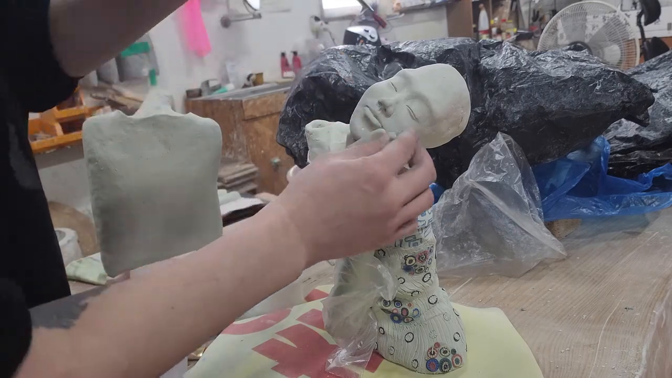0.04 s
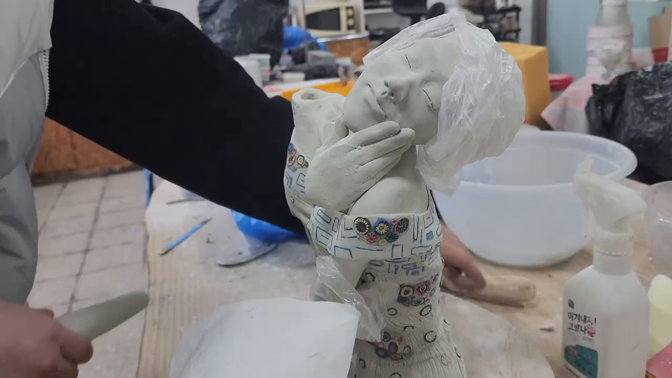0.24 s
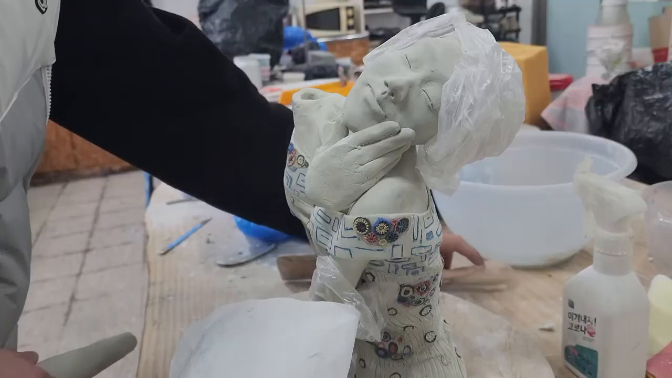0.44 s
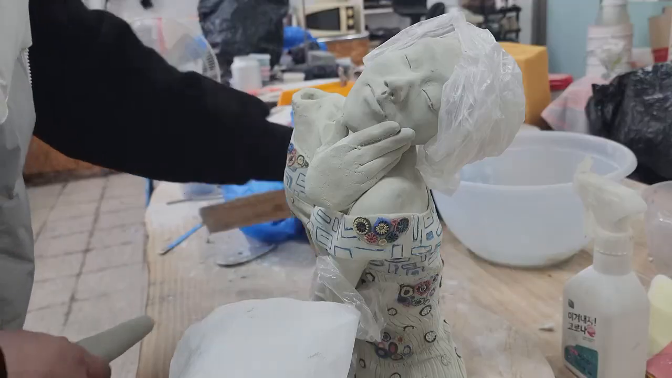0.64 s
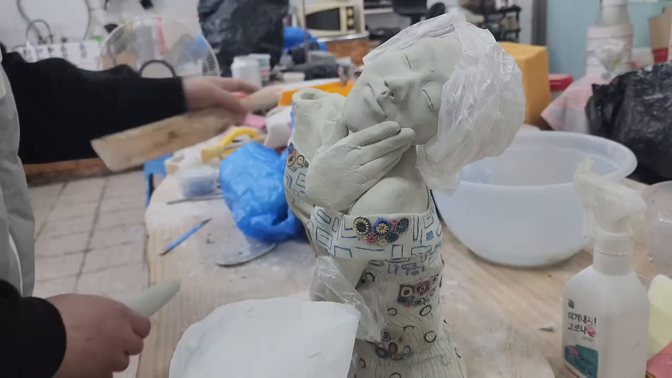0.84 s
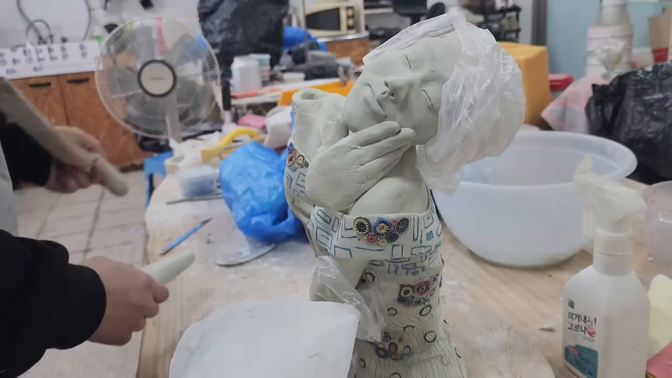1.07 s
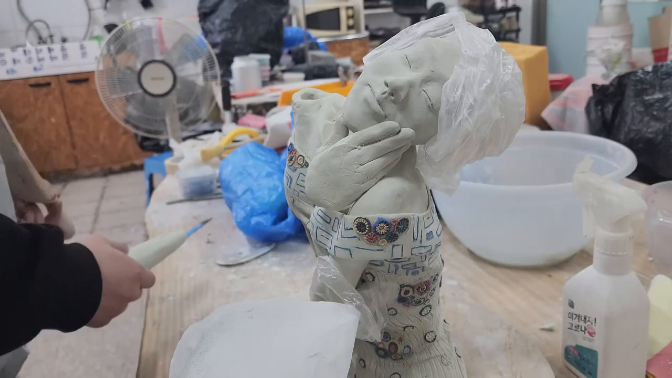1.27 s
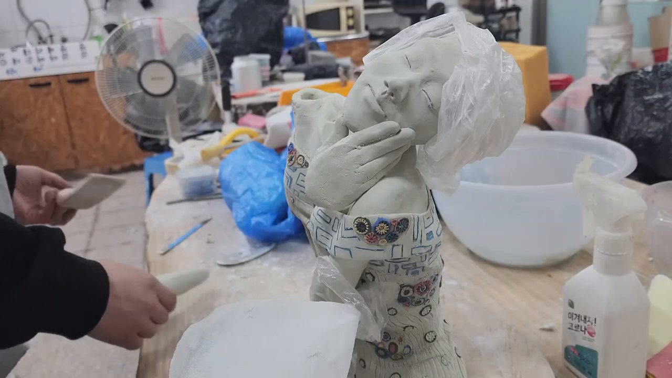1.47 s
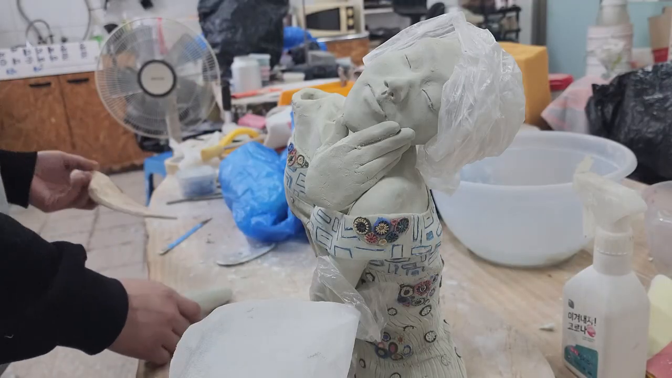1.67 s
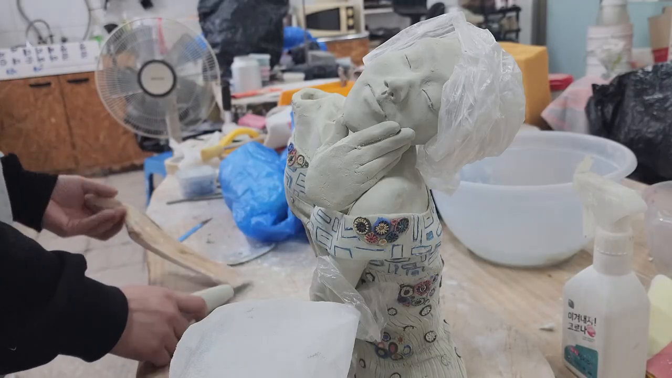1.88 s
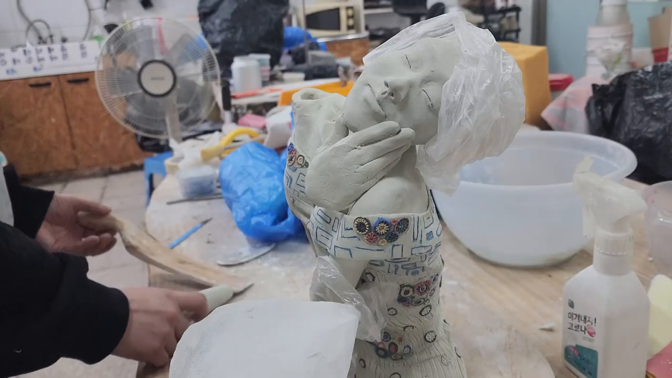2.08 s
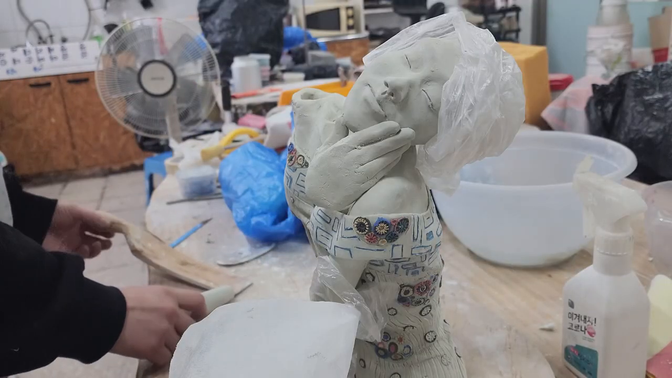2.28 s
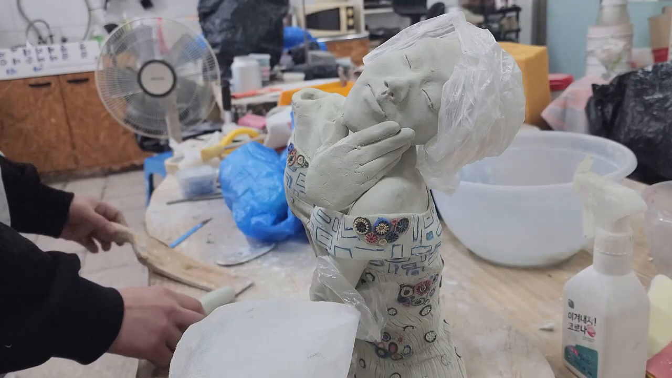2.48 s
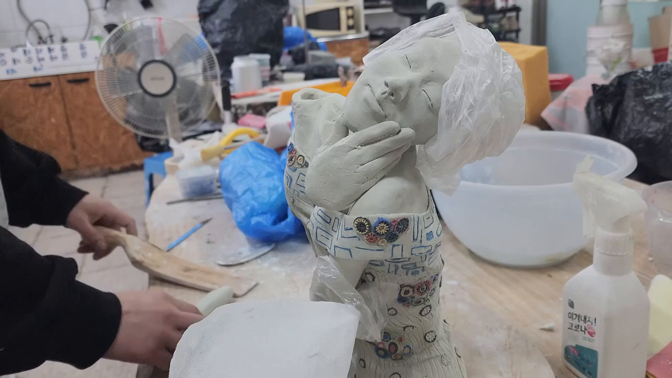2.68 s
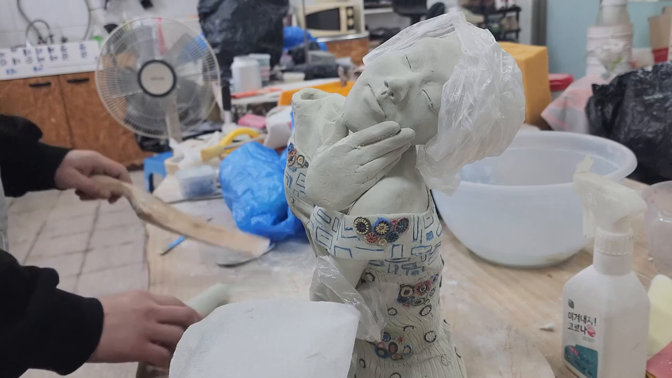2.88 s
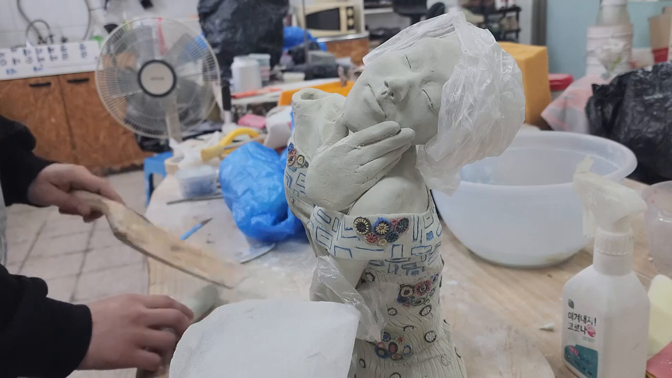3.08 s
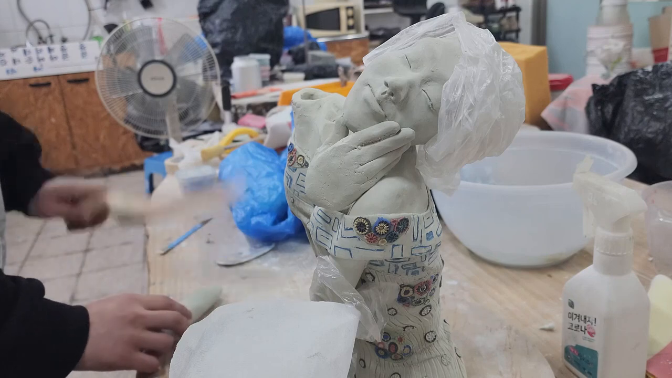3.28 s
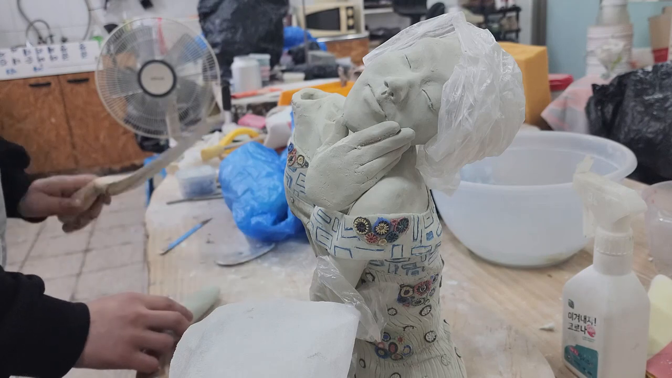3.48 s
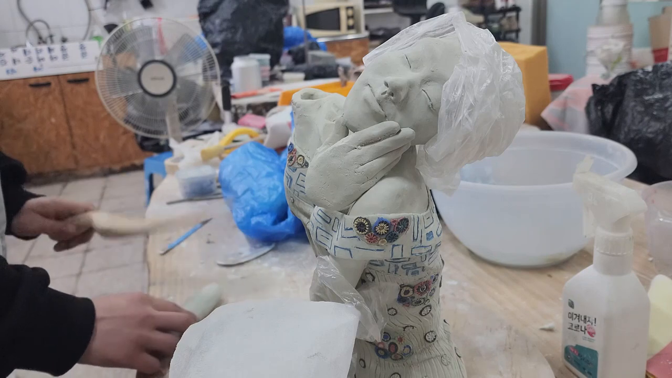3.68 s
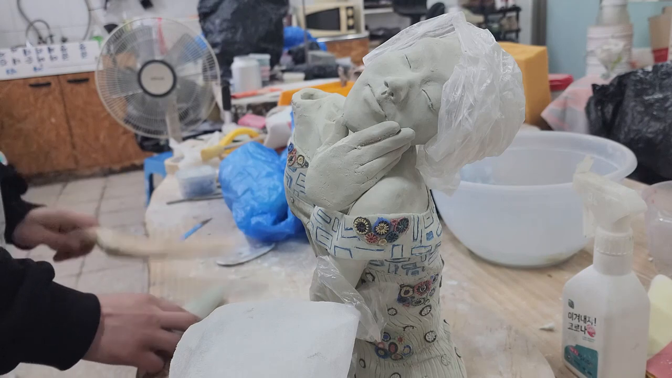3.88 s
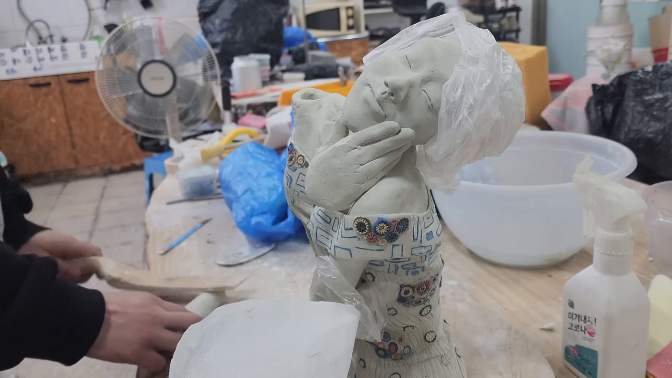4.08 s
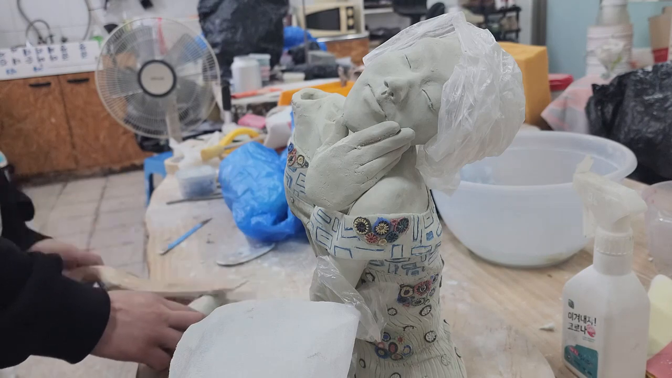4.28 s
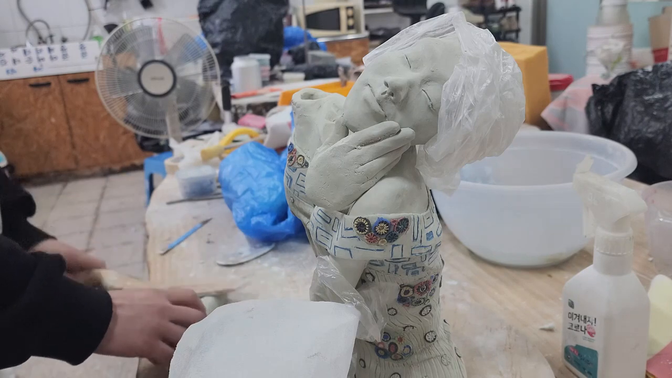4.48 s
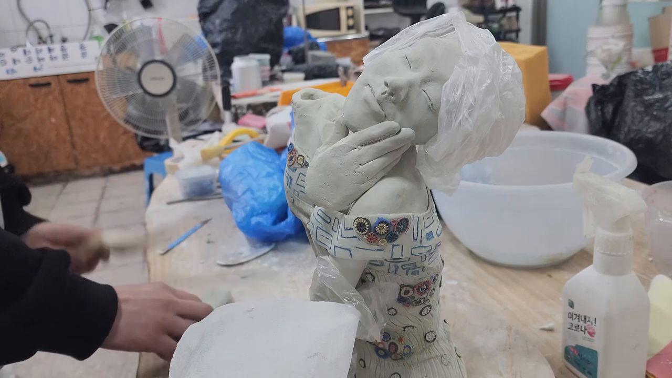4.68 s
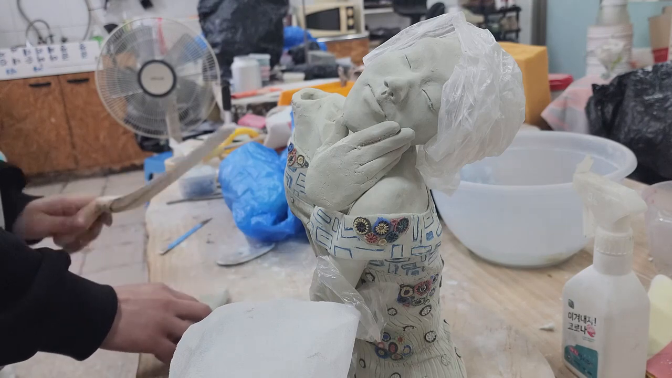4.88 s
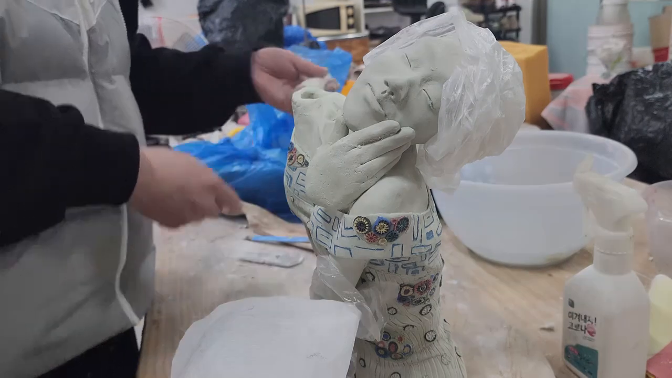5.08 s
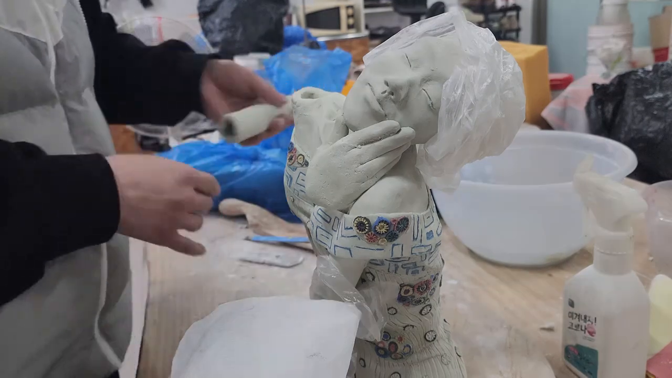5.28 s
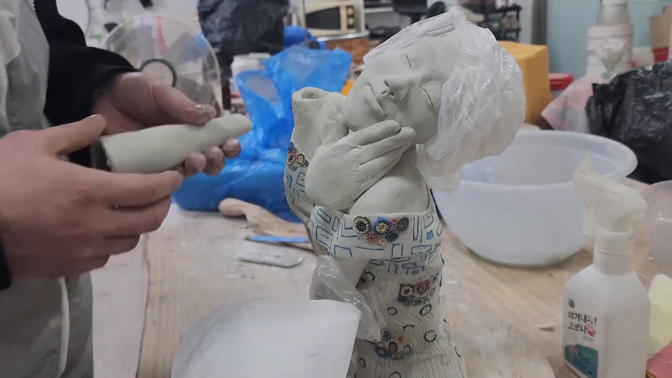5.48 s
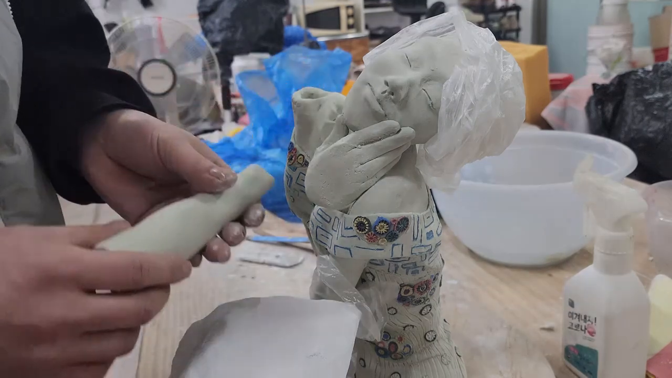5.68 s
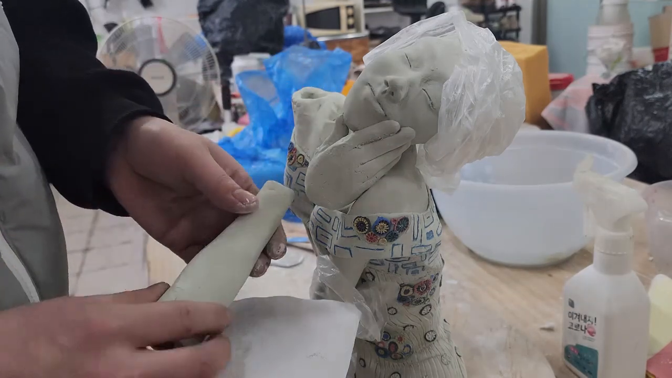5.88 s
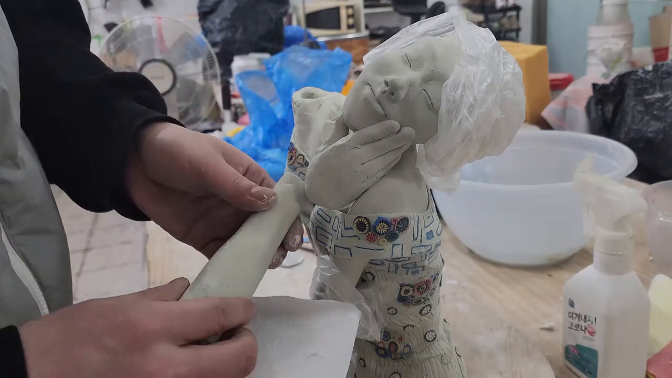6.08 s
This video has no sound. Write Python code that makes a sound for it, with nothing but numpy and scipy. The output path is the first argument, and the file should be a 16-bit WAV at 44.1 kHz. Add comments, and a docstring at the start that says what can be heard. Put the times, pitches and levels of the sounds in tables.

```python
"""A wooden paddle beats a roll of soft clay eight times in a pottery studio.
Each impact excites a wet slap, a hollow tock of paddle modes damped by the clay and a thump of the
bench; a small hard room reflects the slap and tock. Beforehand the paddle is picked up, clacking and
scraping on the bench, while sleeves swish. The last blow stops abruptly; then hands slide over the
clay with a faint hiss of friction. A low rumble and a machine hum lie underneath."""
import sys
import numpy as np
from scipy import signal
from scipy.fft import rfft, irfft, next_fast_len
from scipy.io import wavfile
from scipy.ndimage import map_coordinates

SR = 44100
rng = np.random.default_rng(int(sys.argv[2]) if len(sys.argv) > 2 else 0)


def int16_out(signal):
    """Quantize to a 16-bit WAV file."""
    q = np.round(np.clip(np.atleast_2d(signal).T, -1, 1) * 32767)
    wavfile.write(sys.argv[1], SR, q.astype(np.int16))


N = 271028
CUTOFF_S = 5.092  # the last blow falls silent here


def amp(db):
    """Amplitude ratio of a level; the tables' levels are relative, before each source's gain."""
    return 10 ** (np.asarray(db) / 20)


def unit(x):
    """Normalisation to rms 1."""
    return x / np.sqrt(np.mean(x ** 2) + 1e-20)


def along(points, hz):
    """Interpolation of (f/Hz, value) points on a logarithmic frequency axis."""
    f, v = np.transpose(points)
    return np.interp(np.log(hz + 1), np.log(f + 1), v)


def curve(rows):
    """Linear interpolation of (t/s, value) rows at every sample."""
    return np.interp(np.arange(N) / SR, *np.transpose(rows))


def wobble(rate):
    """Random modulation: a spline through rate knots a second."""
    return map_coordinates(rng.standard_normal(int(N * rate / SR) + 4), [np.arange(N) * rate / SR])


def filtered(x, response):
    """Linear filtering: the spectrum is multiplied by a complex frequency response."""
    n = x.shape[-1]
    m = next_fast_len(n + SR // 4, True)
    return irfft(rfft(x, m) * response(np.fft.rfftfreq(m, 1 / SR)), m)[..., :n]


def coloured(x, points, size=1024):
    """Minimum-phase filtering by (f/Hz, level/dB) points; folding the cepstrum makes it causal."""
    cepstrum = irfft(np.log(amp(along(points, np.fft.rfftfreq(size, 1 / SR)))))
    cepstrum[1:size // 2] *= 2
    cepstrum[size // 2 + 1:] = 0
    return signal.fftconvolve(x, irfft(np.exp(rfft(cepstrum))))[:len(x)]


def stereo(pair, spectrum, coherence):
    """Partial coherence: two independent noises mix as mid and side into left and right."""
    def response(hz):
        angle = np.arccos(np.clip(along(coherence, hz), -1, 1)) / 2
        return amp(along(spectrum, hz)) * np.array([np.cos(angle), np.sin(angle)])
    mid, side = filtered(pair, response)
    return np.array([mid + side, mid - side])


def noise(spectrum, coherence):
    """Stationary stereo noise of rms 1."""
    return unit(stereo(rng.standard_normal((2, N)), spectrum, coherence))


def fade(t60):
    """One second of exponential decay, 60 dB in t60 seconds."""
    return np.exp(-np.log(1000) * np.arange(SR) / SR / t60)


def mode(hz, t60, rise):
    """A damped oscillator that builds up over rise seconds."""
    t = np.arange(SR) / SR
    return np.sin(2 * np.pi * hz * t) * fade(t60) * (1 - np.exp(-(t / rise) ** 2))


def ring(modes, rise, scatter_db, detune):
    """Modal superposition with alternating signs; strength and pitch vary with each contact."""
    return sum((-1) ** k * amp(db + scatter_db * rng.normal())
               * mode(hz * (1 + detune * rng.normal()), t60, rise)
               for k, (hz, db, t60) in enumerate(modes))


def burst(colour, t60, rise):
    """A broadband transient: decaying noise of unit energy, then coloured."""
    crack = rng.standard_normal(SR) * fade(t60) * (1 - np.exp(-np.arange(SR) / SR / rise))
    return coloured(crack / np.linalg.norm(crack), colour)


def add(track, s, sound):
    """Superposition at time s; a sound begun before CUTOFF_S ends there at the latest."""
    start = round(s * SR)
    end = round(CUTOFF_S * SR) if s < CUTOFF_S else N
    part = sound[:, :end - start]
    track[:, start:start + part.shape[1]] += part


# ambient noise spectrum before its tilt: f/Hz, level/dB
AMBIENT_SPECTRUM = [(12, -27.5), (20, -2), (43, -3), (101, -5), (127, -5.5), (241, -17.5), (319, -17.5),
                    (434, -24), (499, -24), (759, -26), (2530, -33.5), (3630, -29.5), (5680, -29.5),
                    (14700, -44), (16000, -41.5)]
# likeness of the ambient noise left and right: f/Hz, coherence
AMBIENT_COHERENCE = [(60, 0.94), (180, 1), (550, 0.45), (1650, 0.06), (4970, 0.075), (15000, 0.25)]
# ambient noise envelope, in three spans: t/s, level/dB
AMBIENT_ENVELOPE = [
    [(0.0, -70), (0.104, -73.5), (0.3, -69)],
    [(0.75, -68.5), (0.95, -66.5), (3.35, -70.5)],
    [(5.15, -64), (5.628, -65), (6.12, -70)],
]
def room_rumble():
    """Ambient noise, most coherent between left and right at long wavelengths."""
    tilt = [(22, -19.0), (31, 0.0), (2000, 7), (5000, -12.5), (12000, -13.5)]  # f/Hz, level/dB
    air = filtered(noise(AMBIENT_SPECTRUM, AMBIENT_COHERENCE), lambda hz: amp(along(tilt, hz)))
    return amp(curve(np.vstack(AMBIENT_ENVELOPE)) + 12) * air


# tone of a machine in the building: f/Hz, level/dB
MACHINE_TONE = [(37.7, -54)]
def machine_hum():
    """A low tone under slow random amplitude and phase modulation."""
    waver_db, drift = 2.5 * wobble(3), 1.2 * wobble(2.5)
    t = np.arange(N) / SR
    return sum(amp(db + waver_db) * np.sin(2 * np.pi * hz * t + drift) for hz, db in MACHINE_TONE)


# reverberation time: f/Hz, T60/s
TAIL_DECAY = [(100, 0.67), (300, 0.35), (800, 0.34), (2200, 0.37), (5000, 0.32), (8000, 0.3), (14000, 0.2)]
# spectrum of the reverberant field: f/Hz, level/dB
TAIL_SPECTRUM = [(100, 16.5), (350, 8), (550, -4), (800, -11.5), (1300, -1.5), (2300, 3), (4200, 5.5),
                 (7000, 1.5), (15000, 6)]
# likeness of the room's field left and right: f/Hz, coherence
ROOM_COHERENCE = [(100, 1), (400, 0.75), (900, 0.82), (1800, 0.13), (4000, .05)]
def room_tail():
    """Impulse response of a diffuse field: noise in which each frequency decays at its own rate."""
    hz, t, bands = signal.stft(rng.standard_normal((2, SR // 2)), SR, nperseg=256)
    decay = np.exp(-np.log(1000) * t / along(TAIL_DECAY, hz)[:, None])
    tail = signal.istft(bands * decay, SR, nperseg=256)[1]
    tail = stereo(tail / np.linalg.norm(tail[0]), TAIL_SPECTRUM, ROOM_COHERENCE)
    tail *= 1 - np.exp(-(np.arange(tail.shape[1]) / SR / 0.0048) ** 2)  # echo density builds up
    return np.pad(tail, ((0, 0), (0, SR - tail.shape[1])))


def reverb(source, colour, source_db, wash_db):
    """Reverberation by convolution, plus a wash of the crack radiated in all other directions."""
    echo = signal.fftconvolve(source[None], room_tail(), axes=1)[:, :SR]
    wash = np.array([coloured(side, colour) for side in room_tail()])
    return amp(source_db) * echo + amp(wash_db) * wash


# echoes from the nearest walls: delay t/s, level/dB
REFLECTIONS = [(.0082, -3.5), (.0098, -18), (0.0152, -23), (.0212, -27), (.028, -11.5)]
# response of those walls: f/Hz, level/dB
WALL_RESPONSE = [(100, -7.5), (800, -25.5), (1400, 1.5), (2300, -0.5), (5000, -13.5), (15000, -11)]
def near_paths(x, lead_s):
    """Path differences: the direct sound arrives first on the left, and early reflections follow."""
    delay = lambda hz, s: np.exp(-2j * np.pi * hz * s)
    direct = filtered(x, lambda hz: delay(hz, lead_s / 2 * np.array([[-1], [1]])))
    walls = lambda hz: sum(amp(db) * delay(hz, s + rng.normal(0, 6e-5, (2, 1))) for s, db in REFLECTIONS)
    return direct + filtered(coloured(x, WALL_RESPONSE), walls)


def strokes(rows, attack_s=0.017, release_s=0.045):
    """Envelope of sliding friction: each rub gathers speed, holds and decays exponentially."""
    t = np.arange(N) / SR
    return sum(amp(db) * np.clip((t - s) / attack_s, 0, 1)
               * np.exp(-np.maximum(t - s - length, 0) / release_s) for s, length, db in rows)


# spectrum of rubbing fabric: f/Hz, level/dB
SLEEVE_SPECTRUM = [(200, -27), (1200, 2), (3000, -1), (7500, 0), (10000, -6.5), (15000, -10.5)]
# moves of the arm: t/s, duration/s, level/dB
ARM_MOVES = [(.28, 0.21, -64.5), (.55, 0.23, -72), (.8, 0.34, -69.5), (1.1, 0.094, -63.5),
             (1.22, 0.07, -66.5), (1.34, .33, -66), (1.84, 0.054, -66.5), (2.11, 0.069, -64.5),
             (2.3, 0.13, -72), (2.65, 0.07, -70), (2.94, .16, -76.5), (3.15, 0.03, -73),
             (3.27, 0.17, -71.5)]
def sleeve():
    """Friction noise of fabric, rising with each move of the arm and while it swings the paddle."""
    t = np.arange(N) / SR
    rest_db, swing_db = -85.5, -72
    swinging = (t > PADDLE_BLOWS[0][0]) & (t < CUTOFF_S)
    motion = amp(rest_db) + amp(swing_db) * swinging + strokes(ARM_MOVES)
    return motion * amp(1.0) * noise(SLEEVE_SPECTRUM, coherence=[(1000, 0.47), (6000, 0.3)])


# spectrum of palms on clay: f/Hz, level/dB
PALM_SPECTRUM = [(710, -39), (1200, -9), (1540, -5), (2680, -3), (4750, -4.5), (7410, -6), (9720, -14),
                 (14800, -18), (16000, -19)]
# fingers taking hold: t/s, duration/s, level/dB
FINGER_GRIPS = [(5.095, 0.097, -68), (5.275, 0.03, -63)]
# one long stroke along the clay: t/s, level/dB
PALM_STROKE = [(5.38, -80), (5.508, -58), (5.59, -60.5), (5.744, -55), (5.858, -59), (6.012, -76),
               (6.13, -71)]
def palms():
    """Friction noise of skin on clay: two short grips, then a smoothing stroke."""
    sliding = np.arange(N) / SR > PALM_STROKE[0][0]
    motion = strokes(FINGER_GRIPS) + amp(curve(PALM_STROKE) - 3) * sliding
    return motion * amp(6.5) * noise(PALM_SPECTRUM, coherence=[(1000, 0.21), (6000, 0.19)])


# brief drags of the paddle: t/s, level/dB, squeak f/Hz
SCRAPES = [(0.959, -53, 5170), (1.351, -46, 3550), (1.457, -54, 4250), (2.6206, -47.5, 3570),
           (2.872, -54.5, 5370), (2.8962, -46, 5430), (3.2708, -57, 6140)]
# spectrum of wood on grit: f/Hz, level/dB
SCRAPE_SPECTRUM = [(300, -25), (2400, -10), (3400, -3.5), (8000, -8), (11000, -19), (16000, -15)]
def paddle_scrapes():
    """Friction on grit: tiny impulsive catches hiss and excite a faint resonant squeak."""
    out = np.zeros((2, N))
    t = np.arange(SR // 4) / SR
    stroke = (t / 0.028) * np.exp(1 - t / 0.026)
    for s, db, squeak_hz in SCRAPES:
        catches = rng.standard_normal((2, len(t))) ** 3  # cubing makes the noise spiky
        grit = filtered(catches, lambda hz: 0.37 + 1 / (1 + 1j * (hz - squeak_hz) / 130))
        add(out, s - .02, amp(db - 10) * stroke * unit(stereo(grit, SCRAPE_SPECTRUM, ROOM_COHERENCE)))
    return out


def contact_colour(smack_db, bite_db, crack_db):
    """Impact spectrum: a flat face smacks (mids), an edge bites, the squeezed surface cracks (treble)."""
    return [(100, smack_db - 16.5), (700, smack_db + 7.5), (1200, smack_db), (2200, smack_db),
            (2900, bite_db), (4400, crack_db - 10.5), (7200, crack_db - 11.5),
            (10000, crack_db - 18.5), (16000, crack_db - 27.5)]


# modes of the free paddle: f/Hz, level/dB, T60/s
FREE_PADDLE_MODES = [(1850, -4, .06), (2650, -2, .035), (3340, -4, .04), (3850, -4, .03), (4300, -3, .03),
                     (5230, -7, .04), (6400, -9, .03), (7300, -9, .03)]
# modes of the lightly touched bench top: f/Hz, level/dB, T60/s
BENCH_TOP_MODES = [(335, 0.5, 0.042), (438.5, -4, 0.08), (566, 4, 0.016)]
# wood and clay touching the bench:
# t/s, crack level/dB, thud level/dB, tock level/dB, tock f/Hz, smack level/dB
LIGHT_CONTACTS = [(0.3582, -45, -51, -49, 780, -66), (0.368, -51, -38.5, -56, 716, -51),
                  (0.3877, -64, -53, -35.5, 1315, -63), (0.3967, -64, -36, -33, 990, -65),
                  (0.409, -54, -50, -26.5, 870, -51), (0.4922, -35, -41.5, -30, 1424, -33.5),
                  (0.5780, -56, -52, -26, 767, -51), (2.0034, -20.5, -43.5, -35, 516, -35.5),
                  (2.5554, -47.5, -52.5, -48, 1440, -50), (2.602, -42.5, -56.5, -52, 925, -55.5),
                  (5.2815, -59, -61.5, -52, 1210, -73), (5.354, -60, -72, -53, 861, -53),
                  (5.725, -68, -55, -50.5, 201, -66)]
def bench_knocks():
    """Free vibration after light impacts: the paddle clacks and tocks, the bench top thuds."""
    out = np.zeros((2, N))
    dulling = [(7000, -2.0), (11000, -6.0)]  # dry wood is duller than wet clay: f/Hz, level/dB
    for s, crack_db, thud_db, tock_db, tock_hz, smack_db in LIGHT_CONTACTS:
        bite_db = (smack_db + crack_db) / 2 - 1
        colour = contact_colour(smack_db, bite_db - 5.5, crack_db)
        colour = [(hz, db + along(dulling, hz)) for hz, db in colour]
        crack = amp(33.0) * burst(colour, t60=0.013, rise=0.00011)
        clack = amp(bite_db - 3) * ring(FREE_PADDLE_MODES, rise=.0002, scatter_db=1.5, detune=.004)
        thud = amp(thud_db + 7.5) * ring(BENCH_TOP_MODES, rise=.0015, scatter_db=1.5, detune=.02)
        tock = amp(tock_db - 4.0) * mode(tock_hz, t60=0.05, rise=0.00059)
        body = clack + thud + tock
        near = near_paths(crack + body, lead_s=.00005)
        room = reverb(body + .5 * crack, colour, source_db=-3, wash_db=27.0)
        add(out, s, near + room)
    return out


# modes of the loaded bench: f/Hz, level/dB, T60/s, rise time/s
LOADED_BENCH_MODES = [(32.5, -15, 1.0, .09), (77.05, -12.5, 0.48, 0.043), (125.3, -9, 0.25, 0.014),
                      (154.1, 2, 0.19, 0.023), (197.8, -7, 0.12, 0.0022), (342.8, -3, 0.15, 0.007),
                      (397, 8, 0.013, 0.0014), (565, -5, 0.027, 0.00016)]
def bench_thump():
    """Modal response of the heavy bench: its low modes swell late and boom on."""
    boom = sum(amp(db + rng.normal(0, 1)) * mode(hz * (1 + rng.normal(0, 0.0034)), t60, rise)
               for hz, db, t60, rise in LOADED_BENCH_MODES)
    return amp(-22) * boom * amp([[-1.6], [1.3]])


# upper modes of the paddle pressed into clay: f/Hz, level/dB, T60/s
DAMPED_PADDLE_MODES = [(1163, -22.5, .025), (1323, -11, 0.044), (1494, 0, 0.026), (1936, -9.5, 0.031),
                       (2073, -4, 0.031), (2415, -17, 0.0845)]
# blows on the clay: t/s, slap level/dB, tock level/dB, tock f/Hz, smack level/dB, bite level/dB
PADDLE_BLOWS = [(3.4204, -28, -14.5, 822, -28, -31.5), (3.6712, -23.5, -9, 790, -23.5, -28),
                (3.8975, -20.5, -9.5, 782, -23.5, -23.5), (4.1331, -23.5, -7, 804, -25, -25.5),
                (4.363, -20.5, -7, 820, -22, -26), (4.5858, -22, -7, 842, -19.5, -17),
                (4.815, -25.5, -12.5, 793, -28, -29.5), (5.0688, -33, -14.5, 848, -25.5, -34)]
def paddle_blows():
    """Damped impact: wet clay slaps and soon stills the paddle's modes, while the bench shakes."""
    out = np.zeros((2, N))
    for s, slap_db, tock_db, tock_hz, smack_db, bite_db in PADDLE_BLOWS:
        colour = contact_colour(smack_db, bite_db, slap_db)
        slap = amp(37.0) * burst(colour, t60=0.0082, rise=0.0018)
        tock = -amp(tock_db + 7.5) * mode(tock_hz, t60=0.027, rise=0.0012)
        overtones = ring(DAMPED_PADDLE_MODES, rise=.0004, scatter_db=2.0, detune=0.012)
        paddle = tock + amp(smack_db + 4.5) * overtones
        thump = bench_thump()
        room = reverb(paddle + .5 * slap, colour, source_db=-1.5, wash_db=29.0)
        add(out, s, near_paths(slap + paddle, lead_s=0.00016) + room + thump)
    return out


def scene():
    """Superposition of impacts, friction and background; impacts and background lean to the right."""
    impacts = (paddle_blows() + bench_knocks()) * amp([[-.6], [.6]])
    rubbing = (sleeve() + palms()) * amp(1.2 * wobble(38))  # the level flickers
    scrapes = paddle_scrapes()
    background = (room_rumble() + machine_hum()) * amp([[-1.6], [1.2]])
    return impacts + rubbing + scrapes + background


def record(dry, top_hz=16300):
    """Hard clipping at full scale, then band limiting by a steep low-pass."""
    return filtered(np.clip(dry, -1, 1), lambda hz: 1 / (1 + (hz / top_hz) ** 120))


dry = scene()
out = record(dry)
int16_out(out)
```